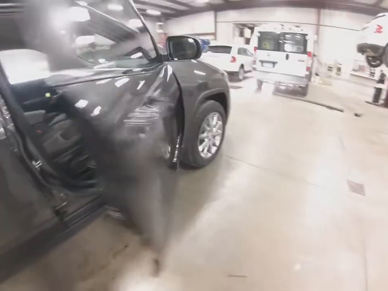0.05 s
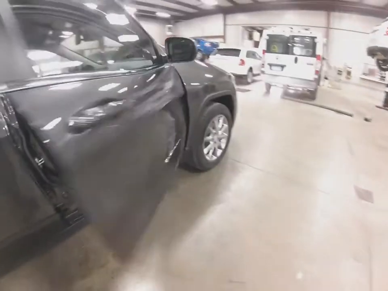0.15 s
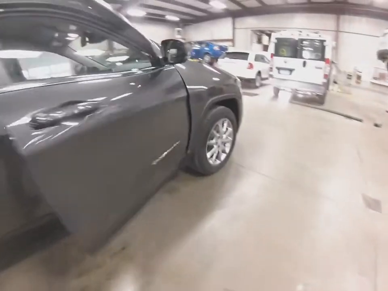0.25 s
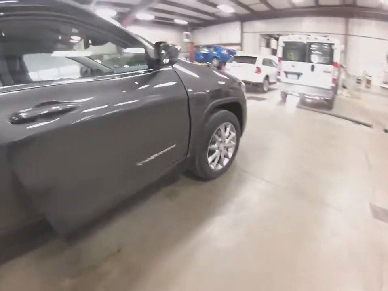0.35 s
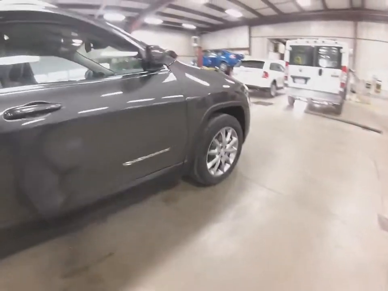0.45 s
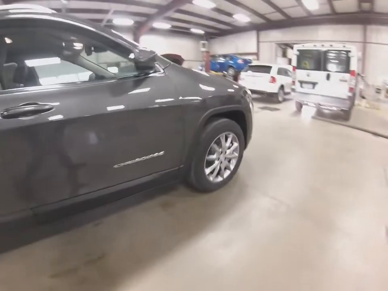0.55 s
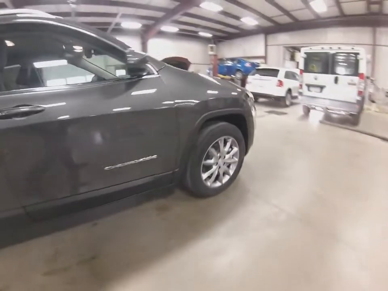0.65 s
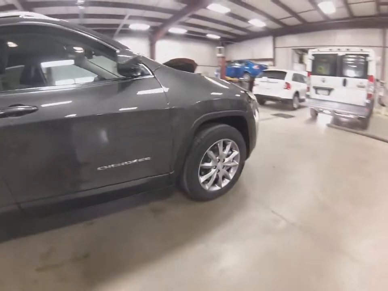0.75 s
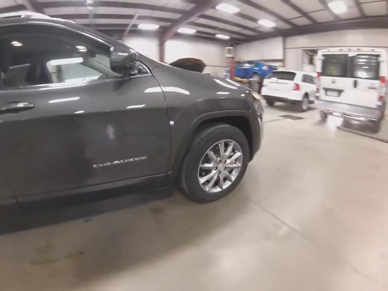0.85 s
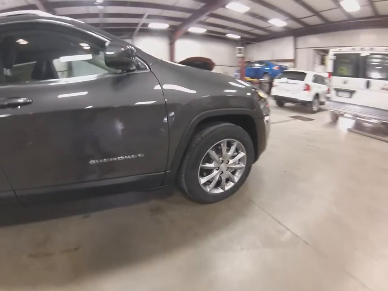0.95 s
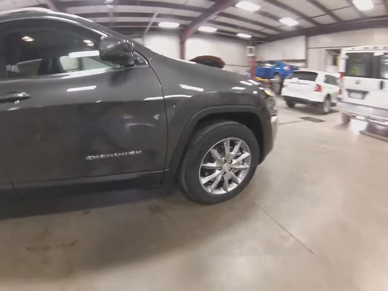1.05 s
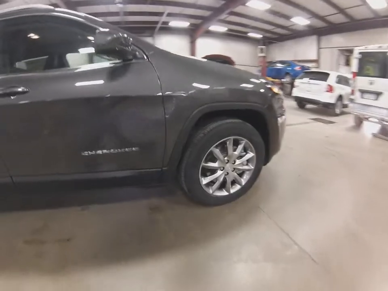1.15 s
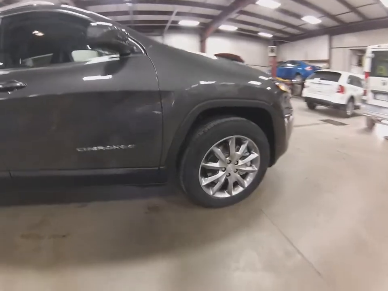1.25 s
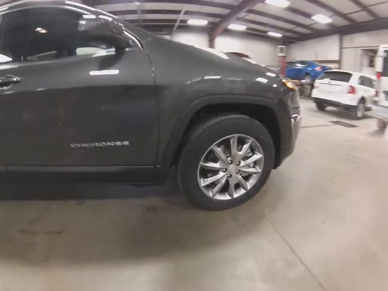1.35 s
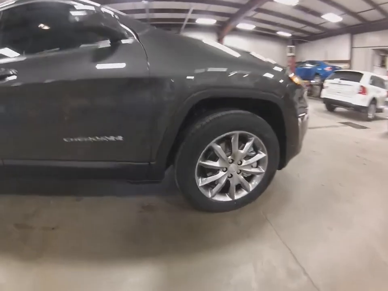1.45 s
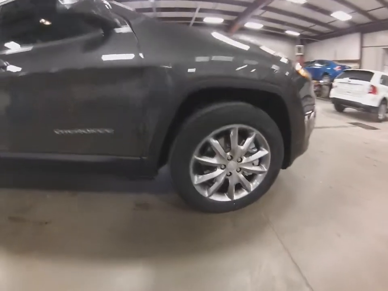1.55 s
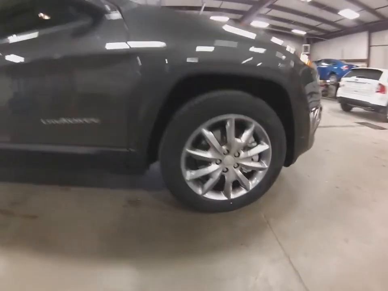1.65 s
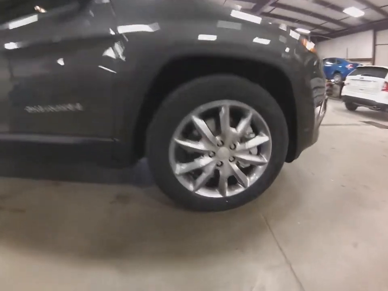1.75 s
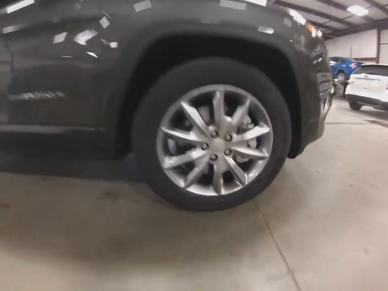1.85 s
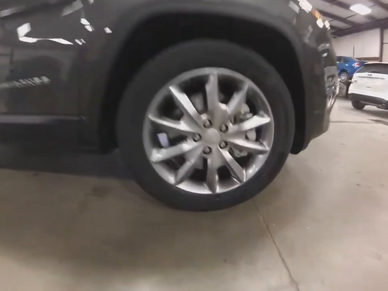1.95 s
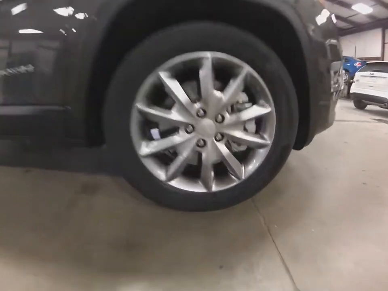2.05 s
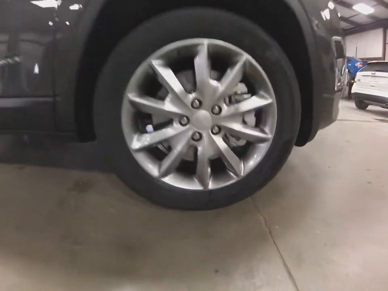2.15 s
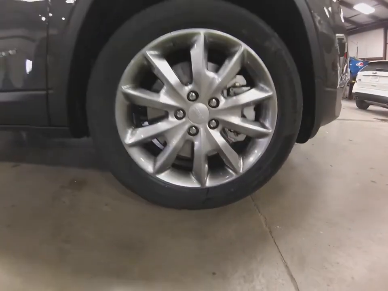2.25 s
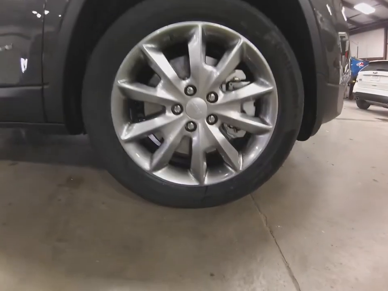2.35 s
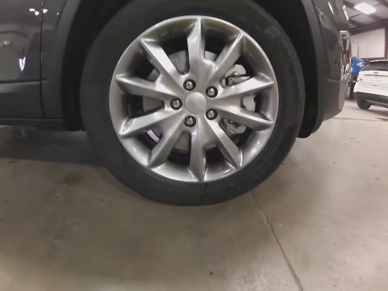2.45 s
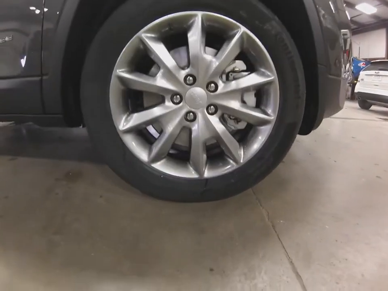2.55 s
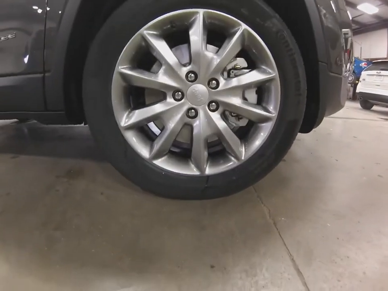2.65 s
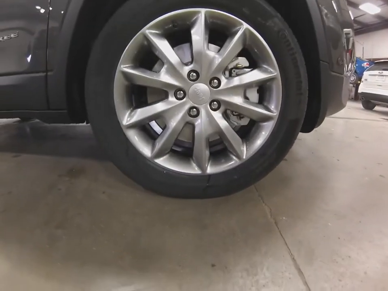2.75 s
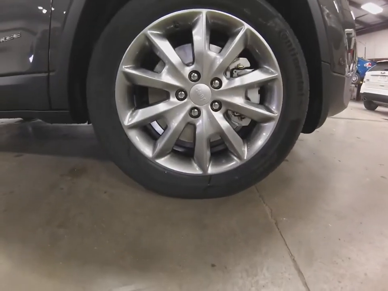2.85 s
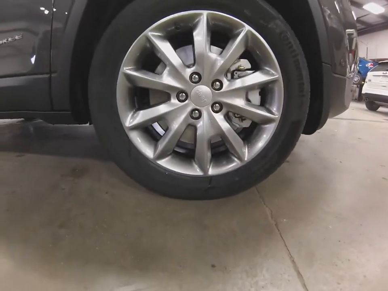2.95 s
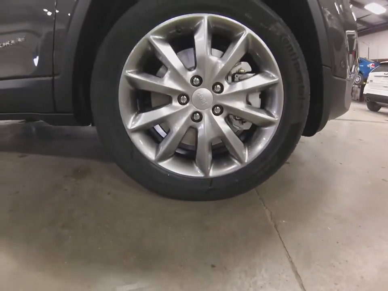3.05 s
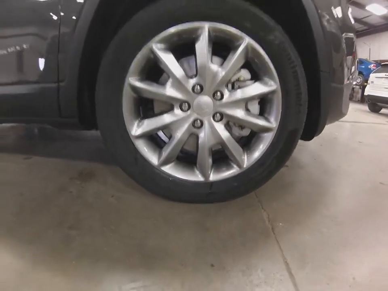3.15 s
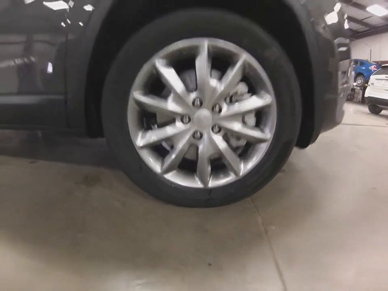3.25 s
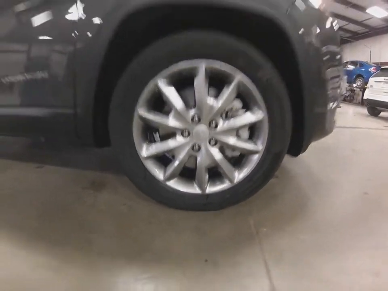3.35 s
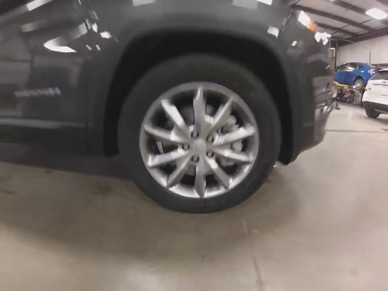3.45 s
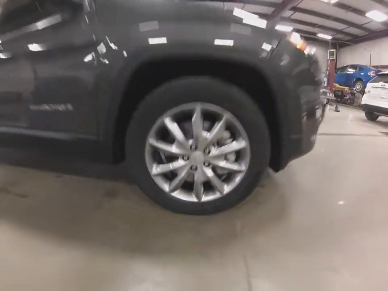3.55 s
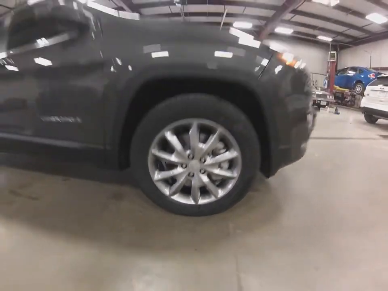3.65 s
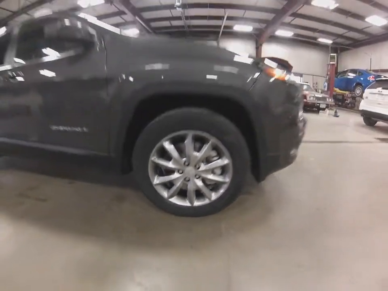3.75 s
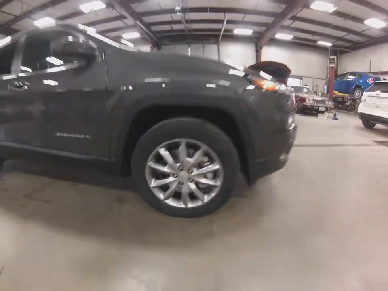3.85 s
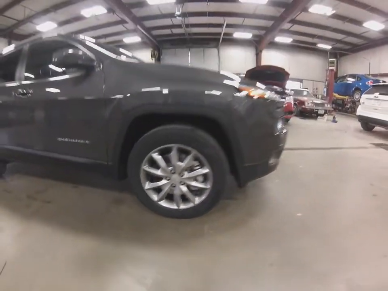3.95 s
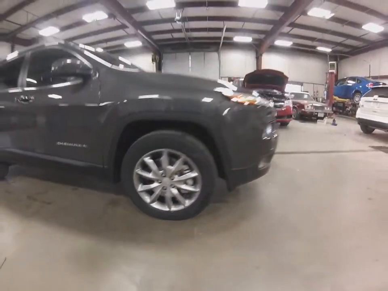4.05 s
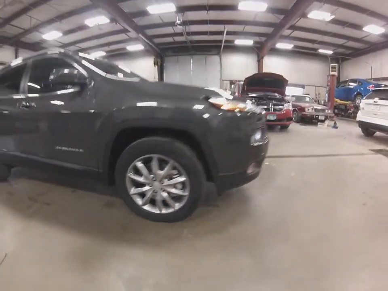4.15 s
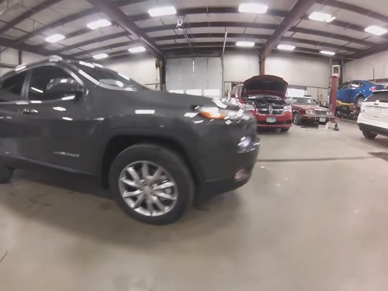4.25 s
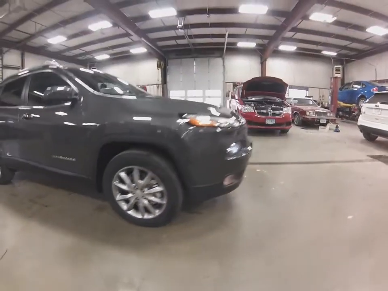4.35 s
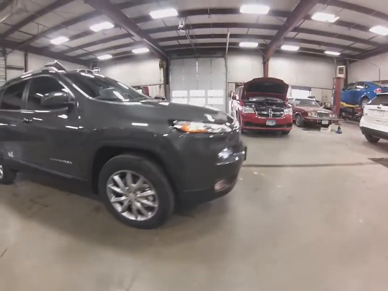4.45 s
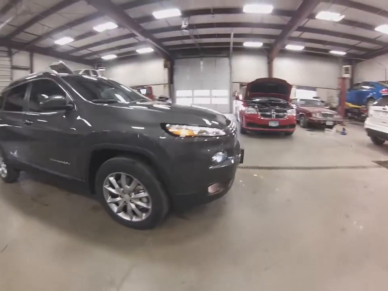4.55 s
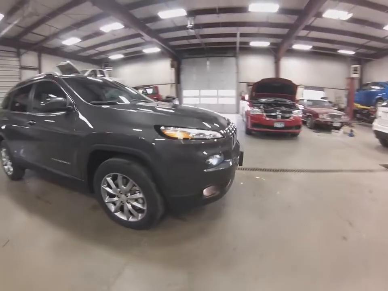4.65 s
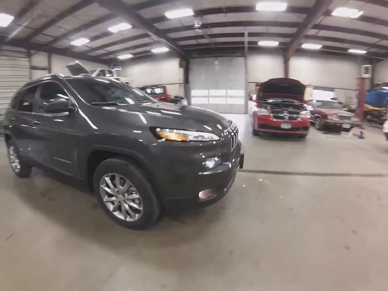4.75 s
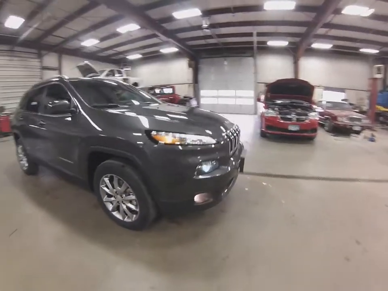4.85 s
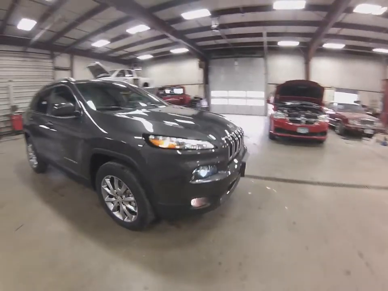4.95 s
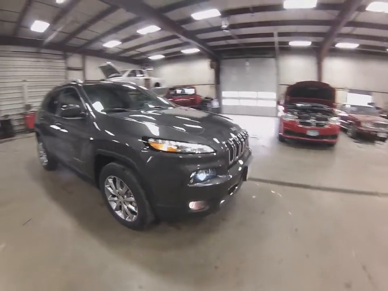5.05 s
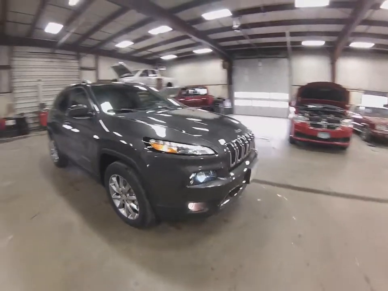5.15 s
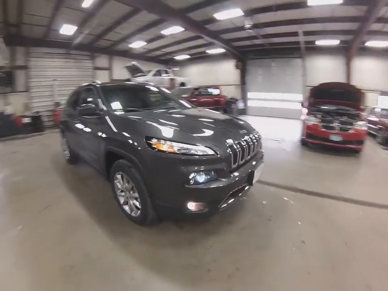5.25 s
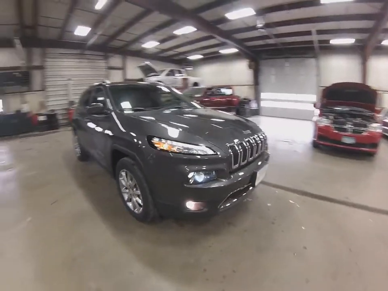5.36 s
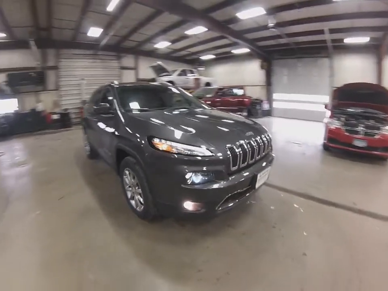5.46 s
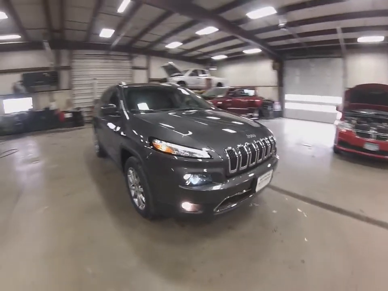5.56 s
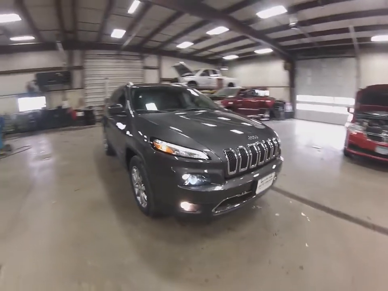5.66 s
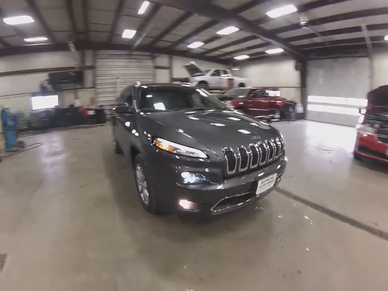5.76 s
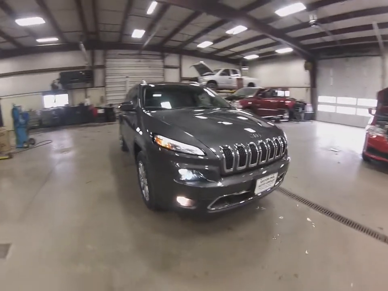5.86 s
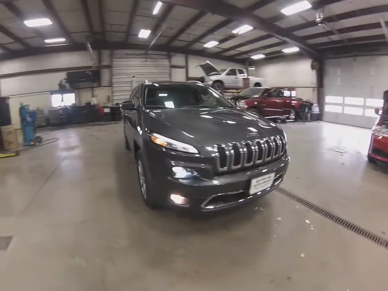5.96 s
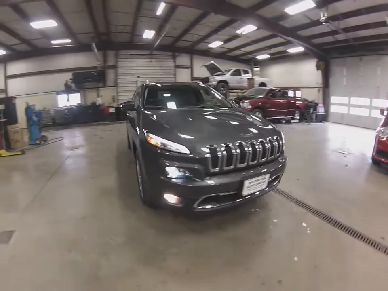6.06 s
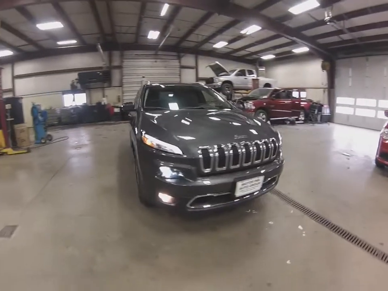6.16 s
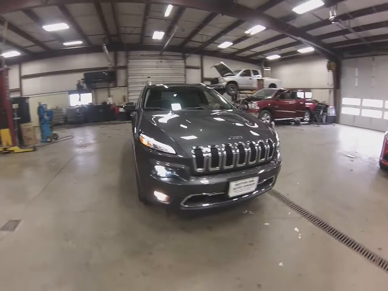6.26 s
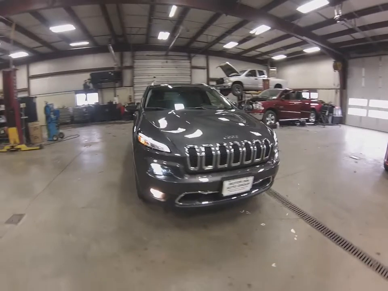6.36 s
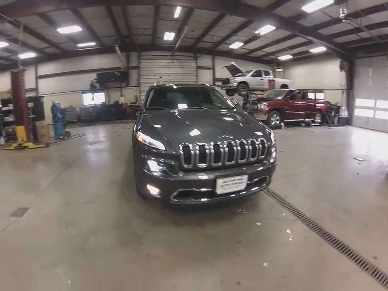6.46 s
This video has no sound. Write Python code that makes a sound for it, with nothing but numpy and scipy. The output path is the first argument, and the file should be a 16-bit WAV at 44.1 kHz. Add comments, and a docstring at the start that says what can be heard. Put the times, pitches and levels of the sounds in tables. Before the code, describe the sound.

Over a droning idle and ventilation rumble, one sharp door slam booms, then engine hiss rises and recedes, with dull distant thumps following.

```python
"""Car door slam beside an idling engine

A car door is slammed in a large workshop while the four-cylinder engine idles: the hinge whispers, the latch
rings, then the lock clatters and the panel booms, almost together, and roof and walls return the boom. The
microphone passes the front wheel, where the engine hisses louder, and moves away. A fan hums, dull thumps come
from across the hall, and a tap, metal ticks and a sliding sole are heard. Bodies are struck modes; rushes and
hisses are shaped noise."""
import sys
import numpy as np
from scipy import signal
from scipy.fft import rfft, irfft
from scipy.io import wavfile
from scipy.ndimage import minimum_filter1d

SR = 44100
rng = np.random.default_rng(int(sys.argv[2]) if len(sys.argv) > 2 else 0)


def wav_out(sig):
    """Save sig, one row per channel (or a flat mono array), as 16-bit PCM at SR to the path in sys.argv[1]."""
    wavfile.write(sys.argv[1], SR, np.round(np.clip(np.atleast_2d(sig).T, -1, 1) * 32767).astype(np.int16))


N = 287046

# Hall reverberation. Each row: frequency in Hz, reverberation level in dB, t60 in seconds.
HALL_REVERB = [(80, -5, 0.65), (147, -7, 0.45), (323, -5, 0.49), (640, -4.5, 0.29), (1500, -3, 0.87),
               (4000, -11, 0.48), (12000, -9, .3)]
# Smeared sound opposite in the two channels. Each row: frequency in Hz, level relative to the shared sound in dB.
WIDTH_SPECTRUM = [(60, -33), (300, -31), (1200, -38.5), (4000, -30.5), (12000, -26)]
# Ventilation spectrum. Each row: frequency in Hz, relative density in dB per Hz.
VENTILATION_SPECTRUM = [(10, -13), (24, -1), (45, 0.5), (70, -5.5), (105, -10), (160, -16.5), (230, -18),
                        (330, -20.5), (480, -25), (610, -23.5), (780, -28), (1150, -23.5), (2300, -32),
                        (5200, -36.5), (8000, -45.5), (15000, -49.5)]
# Fan tones before the swell below. Each row: mean frequency in Hz, level in dB rms.
FAN_TONES = [(301.3, -54), (431, -64.5), (602.6, -70.5), (1233, -69)]
# Swell and fade of the fan's hum along the walk. Each row: time in seconds, gain in dB.
FAN_SWELL = [(0, -9), (1.5, -2), (2.8, -4), (3.7, 3), (4.3, -3), (5.1, 3.5), (5.52, -3.5), (5.9, 4)]

# Dull thumps across the hall. Each row: start in seconds, level in dB, contact in seconds, first rattle knock in dB.
THUMP_HITS = [(4.25, -16.5, 0.014, -26), (4.321, -19.5, 0.009, -32.5), (4.41, -24.5, 0.016, -41),
              (4.534, -24, 0.014, -61), (5.493, -29, 0.013, -49), (5.58, -24.5, 0.014, -48),
              (6.128, -24.5, 0.0075, -46)]
# Thumped body. Each row: frequency in Hz, level in dB, t60 in seconds.
THUMP_BODY_MODES = [(46, 3.5, 0.097), (88.5, 0.5, 0.048), (133.4, -0.5, 0.12), (198, -6, 0.19),
                    (257, -10, 0.13), (335, -10, .08)]
# A rattle is a dying run of lighter knocks.
RATTLE_DELAY_S, RATTLE_GAP_S, RATTLE_CONTACT_S, RATTLE_LOSS_DB = 0.027, 0.014, 0.0039, 2.5

# Sole sliding on concrete. Each row: time of the peak in seconds, level in dB.
SCUFF_PEAKS = [(6.115, -57.5), (6.2, -56.5)]
# Sliding hiss. Each row: frequency in Hz, relative density in dB per Hz.
SCUFF_SPECTRUM = [(2000, -25), (4500, -4), (6200, 6), (7500, -5), (10000, -9), (15000, -17)]
SCUFF_RISE_S, SCUFF_T60_S = 0.029, 0.6

# Small bright metal ticks. Each row: start in seconds, level in dB, frequency in Hz.
METAL_TICKS = [(1.635, -45, 9800), (2.6376, -35.5, 10100), (3.0596, -40.5, 9750), (3.075, -46, 11450),
               (3.205, -48, 11900)]
# Light tap. Each row: start in seconds, level in dB, contact in seconds.
TAP_HITS = [(1.7328, -31, .0003)]
# Tapped body. Each row: frequency in Hz, level in dB, t60 in seconds.
TAP_BODY_MODES = [(294, -9.5, 0.1), (540, 6, 0.0091), (930, 3, 0.0082), (1600, -1, 0.0068)]

# Microphone path from the front wheel. Each row: time in seconds, forward in m, outward in m.
MIC_PATH = [(0, -2, 1.23), (1, -0.6, 1.26), (1.5, -0.8, 0.81), (2.05, -0.12, 0.63), (2.8, 0, 0.59),
            (3.3, -0.08, .6), (3.8, 0.14, 1.12), (4.5, 1.85, 1.3), (6.51, 3, 1.2)]
FIRINGS_PER_S, IDLE_WANDER = 37.6, 0.0024  # mean rate, spread as a share of it
# Engine drone. Each row: multiple of the firing rate, mean level relative to the drone gain in dB.
DRONE_ORDERS = [(2, -2.5), (2.5, -25), (3, 2), (3.5, -14.5), (4, -11), (4.5, -14.5), (5, -9.5), (6, -27),
                (7.5, -12.5)]
# Engine bay rush. Each row: frequency in Hz, relative density in dB per Hz.
BAY_SPECTRUM = [(150, -19), (350, 6.5), (700, -7), (1000, -3.5), (1900, 1.5), (2400, 1.5), (3100, 3),
                (4200, -1), (5500, -6), (7000, -10), (8500, -36), (15000, -55)]
# Engine whine and humps in the bay rush. Each row: centre in Hz, width in Hz, rise in dB.
BAY_WHINE_AND_HUMPS = [(902, 32, 13), (1097, 78, 6.5), (1240, 220, 7.5), (1471, 72, 10.5), (1772, 63, 7.5),
                       (2102, 27, 6), (3090, 140, 3), (4170, 54, 3.5), (7720, 110, 15)]
# Belt hiss. Each row: frequency in Hz, relative density in dB per Hz.
BELT_SPECTRUM = [(5000, -23), (7500, -3), (8700, -2), (10200, -1.5), (12500, -0.5), (14000, -4),
                 (16000, -0.5)]
# Hollow rush from under the car. Each row: frequency in Hz, relative density in dB per Hz.
UNDERBODY_SPECTRUM = [(250, -9), (450, -4.5), (700, 3), (900, 1.5), (1300, -39)]
# Gap under the car. Each row: centre in Hz, width in Hz, rise in dB.
UNDERBODY_RESONANCES = [(577, 26, 11.7), (640, 45, 9), (801, 22, 9.5)]
# Injector ticks. Each row: frequency in Hz, relative density in dB per Hz.
INJECTOR_SPECTRUM = [(9000, -18), (12000, -8), (13500, 7), (15500, -1)]
# Tick strength in firing order, nearer injectors louder. Each entry: mean level in dB.
CYLINDER_TICKS_DB = [2.0, -4.0, -1.0, -5.0]
# Engine parts. Each holds: gain at 1 m in dB, place forward of the wheel in m, loss per doubling of distance in dB.
DRONE_PLACE = (-45.5, -0.18, 4.34)
BAY_PLACE = (-49, 0.025, 7.6)
UNDERBODY_PLACE = (-51.5, -0.75, 5.2)
BELT_PLACE = (-58.5, 0.19, 6.3)
INJECTOR_PLACE = (-58, -.1, 10.5)

# Hinge hiss. Each row: frequency in Hz, relative density in dB per Hz.
HINGE_SPECTRUM = [(2000, -20), (5500, 2), (15000, -4)]
# Hinge resonances. Each row: centre in Hz, width in Hz, rise in dB.
HINGE_RESONANCES = [(5600, 400, 5), (8700, 700, 12), (12100, 450, 12)]
# Latch meets striker. Each row: start in seconds, level in dB, contact in seconds.
LATCH_CONTACTS = [(.5257, -8, 0.000087), (.5293, -19, 0.00051), (.5338, -14, 0.000097)]
# Latch ring. Each row: frequency in Hz, level in dB, t60 in seconds.
LATCH_RING_MODES = [(434, -7.5, 0.044), (790, -15.5, 0.052), (1350, -16, 0.029), (1424, 2, 0.051),
                    (1620, -27, 0.028), (2200, -17, 0.024), (3020, -21.5, .025)]
# Door meets seal and frame. Each row: start in seconds, level in dB, contact in seconds.
DOOR_CONTACTS = [(.5391, 0, .001), (.5416, -5, .0012)]
# Door and cabin. Each row: frequency in Hz, level in dB, t60 in seconds.
DOOR_CABIN_MODES = [(28.5, -6.5, 0.17), (53, -9.5, 0.15), (100, -8.5, 0.08), (166, -10.5, 0.022),
                    (228, -22, 0.052), (316, -16, 0.095), (380, -10.5, 0.05), (477, -15, 0.038),
                    (794, -21, 0.076)]
# Lock and trim clatter. Each row: start in seconds, level in dB rms, t60 in seconds.
CLATTER_BURSTS = [(.538, -14, 0.038), (0.5396, -20.5, 0.032), (0.54, -25, 0.12), (0.552, -33, 0.065)]
# Clatter noise. Each row: frequency in Hz, relative density in dB per Hz.
CLATTER_SPECTRUM = [(300, 13.5), (800, -4), (1800, -5), (3000, -14.5), (5000, -12.5), (8000, -17),
                    (11000, -28.5), (15000, -26)]
# Boom between floor and roof: round trip, level of the first return, loss per return.
FLUTTER_S, FLUTTER_DB, FLUTTER_LOSS_DB = 0.0345, -11.5, 4.5
# Boom back once from each wall. Each row: delay in seconds, level in dB.
WALL_ECHOES = [(.107, -19), (.157, -14), (.194, -15.5), (.256, -17)]

CUTOFF_HZ = 15300


def from_db(db):
    """Decibels to gain."""
    return 10 ** (np.asarray(db) / 20)


def rms_one(x):
    """Scale to unit rms."""
    return x / np.sqrt(np.mean(x ** 2) + 1e-20)


def in_time(rows):
    """Interpolate each column of a timed curve at every sample."""
    time_s, *columns = np.transpose(rows)
    return [np.interp(np.arange(N) / SR, time_s, column) for column in columns]


def drift(rate_hz):
    """Random wander of unit rms, mostly slower than rate_hz."""
    hz = np.arange(N // 2 + 1) * SR / N
    spectrum = rfft(rng.standard_normal(N)) / (1 + (hz / rate_hz) ** 2)
    return rms_one(irfft(spectrum, N))


def spectrum_db(rows):
    """Interpolate a spectrum over log frequency; also return the frequency bins."""
    hz = np.maximum(np.arange(N // 2 + 1) * SR / N, 1)
    points_hz, levels_db = np.transpose(rows)
    return hz, np.interp(np.log(hz), np.log(points_hz), levels_db)


def noise(spectrum, humps=()):
    """Unit-rms noise with a smooth spectrum and humps on it."""
    hz, db = spectrum_db(spectrum)
    for centre_hz, width_hz, rise_db in humps:
        db = db + rise_db / (1 + (2 * (hz - centre_hz) / width_hz) ** 2)
    return rms_one(irfft(rfft(rng.standard_normal(N)) * from_db(db), N))


def dying(start_s, t60_s):
    """An envelope that jumps to 1 and decays by 60 dB in t60_s."""
    age_s = np.arange(N) / SR - start_s
    return (age_s >= 0) * np.exp(-np.log(1000) * np.clip(age_s / t60_s, 0, 10))


def strike(hits, modes, rise_s=0.0001):
    """Rounded pushes ring a body's modes; longer contact is duller, and the ring takes a moment to spread."""
    force = np.zeros(N)
    for start_s, db, contact_s in hits:
        contact_s = max(contact_s, 2 / SR)
        progress = np.clip((np.arange(N) / SR - start_s) / contact_s, 0, 1)
        push = np.sin(np.pi * progress) ** 2
        force += from_db(db) * push / push.sum()
    t = np.arange(SR // 2) / SR
    ring = np.zeros(len(t))
    for hz, db, t60_s in modes:
        ring += from_db(db) * np.cos(2 * np.pi * hz * t) * np.exp(-np.log(1000) * t / t60_s)
    return signal.fftconvolve(force, ring * (1 - np.exp(-t / rise_s)))[:N]


def hall(x, build_s=0.011):
    """Diffuse reverberation: octave bands of noise build up and die at their own pace."""
    t = np.arange(SR) / SR
    response = np.zeros(SR)
    points_hz, levels_db, t60s_s = np.transpose(HALL_REVERB)
    for low_hz in 56 * 2.0 ** np.arange(8):
        log_centre = np.log(low_hz * np.sqrt(2))
        level_db = np.interp(log_centre, np.log(points_hz), levels_db)
        t60_s = np.interp(log_centre, np.log(points_hz), t60s_s)
        envelope = np.exp(-np.log(1000) * t / t60_s) * (1 - np.exp(-t / build_s))
        band = signal.butter(2, [low_hz, 2 * low_hz], "band", fs=SR, output="sos")
        tail = signal.sosfilt(band, rng.standard_normal(SR) * envelope)
        response += from_db(level_db) * np.sqrt(2 * low_hz / SR) * tail / np.linalg.norm(tail)
    return signal.fftconvolve(x, response)[:N]


def smeared(x, smear_t60_s=0.12):
    """A faint copy of the sound, smeared in time by a dying noise burst."""
    _, db = spectrum_db(WIDTH_SPECTRUM)
    burst = rng.standard_normal(N) * dying(0, smear_t60_s)
    faint = irfft(rfft(x) * from_db(db), N)
    return signal.fftconvolve(faint, burst / np.linalg.norm(burst))[:N]


def sideways(x):
    """Opposite in the two channels: heard as width."""
    return x * np.array([[1], [-1]])


def shop(air_db=-40.5, waver_db=1.5, wander_hz=1.39):
    """Ventilation rumbles as shaped noise; a fan's tones waver in level and pitch."""
    fan = np.zeros(N)
    for hz, db in FAN_TONES:
        level = from_db(db + waver_db * drift(4.1))
        phase = 2 * np.pi * np.cumsum(hz + wander_hz * drift(3.1)) / SR
        fan += level * np.sin(phase)
    swell = from_db(in_time(FAN_SWELL)[0])
    return from_db(air_db) * noise(VENTILATION_SPECTRUM) + np.sqrt(2) * swell * fan


def thumps(wet_db=-1.0, uneven=0.15):
    """Each distant thump is a soft push followed by a short uneven rattle."""
    hits = []
    for start_s, db, contact_s, rattle_db in THUMP_HITS:
        hits.append((start_s, db, contact_s))
        for k, slip in enumerate(rng.standard_normal(size=3)):
            knock_s = start_s + RATTLE_DELAY_S + RATTLE_GAP_S * (k + uneven * slip)
            hits.append((knock_s, rattle_db - k * RATTLE_LOSS_DB, RATTLE_CONTACT_S))
    body = -strike(hits, THUMP_BODY_MODES)
    return body + from_db(wet_db) * hall(body)


def scuff():
    """A soft hiss, as of a sole sliding on concrete: each slide swells quickly and dies away."""
    t = np.arange(N) / SR
    slides = np.zeros(N)
    for peak_s, db in SCUFF_PEAKS:
        swell = np.exp(-np.abs(t - peak_s) / SCUFF_RISE_S)
        slides += from_db(db) * np.where(t < peak_s, swell, dying(peak_s, SCUFF_T60_S))
    return slides * noise(SCUFF_SPECTRUM)


def tap(wet_db=-4.0):
    """A brief contact rings a small body, and the hall answers."""
    body = strike(TAP_HITS, TAP_BODY_MODES)
    return body + from_db(wet_db) * hall(body)


def metal_ticks(tick_t60_s=0.031, ring_db=-14, ring_t60_s=0.3):
    """Decaying tones with a short sharp start and a faint, randomly modulated ring."""
    t = np.arange(N) / SR
    ticks = np.zeros(N)
    for start_s, db, hz in METAL_TICKS:
        ring = from_db(ring_db) * drift(120) * dying(start_s, ring_t60_s)
        ticks += from_db(db) * np.sin(2 * np.pi * hz * t) * (dying(start_s, tick_t60_s) + ring)
    return ticks


def heard_from(place):
    """Gain of a part of the engine, by its distance from the walking microphone."""
    level_db, place_m, loss_db = place
    forward_m, outward_m = in_time(MIC_PATH)
    distance_m = np.hypot(forward_m - place_m, outward_m)
    return from_db(level_db - loss_db * np.log2(distance_m + 1e-9))


def injectors(phase, tick_t60_s=0.035, uneven_db=2.2):
    """One faint bright tick per firing; its strength depends on the cylinder and on chance."""
    firing, part = np.divmod(phase / (2 * np.pi), 1)
    firing = firing.astype(int)
    cylinder_db = np.array(CYLINDER_TICKS_DB)[firing % len(CYLINDER_TICKS_DB)]
    strength_db = cylinder_db + uneven_db * rng.standard_normal(size=400)[firing]
    decay = np.exp(-np.log(1000) * part / FIRINGS_PER_S / tick_t60_s)
    return noise(INJECTOR_SPECTRUM) * from_db(strength_db) * decay


def engine(firing_db=-39.5, waver_db=1.5, throb=0.07):
    """Firing pulses drone through the body; belts and valves rush out of the wheel arch and from under the car."""
    phase = 2 * np.pi * np.cumsum(FIRINGS_PER_S * (1 + IDLE_WANDER * drift(1.59))) / SR
    drone = np.zeros(N)
    for multiple, db in DRONE_ORDERS:
        level = from_db(db + waver_db * drift(6.1))
        drone += level * np.sin(multiple * phase + rng.uniform(0, 2 * np.pi))
    # the long wave of the firing rate fills the hall evenly
    firing = from_db(firing_db) * np.sin(phase)
    tones = np.sqrt(2) * (firing + heard_from(DRONE_PLACE) * drone)
    rush = heard_from(BAY_PLACE) * noise(BAY_SPECTRUM, BAY_WHINE_AND_HUMPS)
    rush += heard_from(BELT_PLACE) * noise(BELT_SPECTRUM)
    rush += heard_from(UNDERBODY_PLACE) * noise(UNDERBODY_SPECTRUM, UNDERBODY_RESONANCES)
    throbbing = rush * (1 + throb * np.cos(phase))
    return tones + throbbing + heard_from(INJECTOR_PLACE) * injectors(phase)


def hinge(level_db=-56.0, swing_s=0.065, stop_s=0.008):
    """A faint hiss that grows as the door swings shut and stops when the latch catches."""
    ahead_s = LATCH_CONTACTS[0][0] - np.arange(N) / SR
    swell = np.exp(-(ahead_s / np.where(ahead_s > 0, swing_s, stop_s)) ** 2 / 2)
    return from_db(level_db) * swell * noise(HINGE_SPECTRUM, HINGE_RESONANCES)


def boom_echoes(boom, wall_hz=85):
    """Roof and walls return only the low part of the boom."""
    low_pass = signal.butter(2, wall_hz, fs=SR, output="sos")
    dull = signal.sosfilt(low_pass, boom)
    t = np.arange(N) / SR
    flutter = [((k + 1) * FLUTTER_S, FLUTTER_DB - k * FLUTTER_LOSS_DB) for k in range(3)]
    return sum(from_db(db) * np.interp(t - delay_s, t, dull) for delay_s, db in flutter + list(WALL_ECHOES))


def door(wet_db=-5, latch_wet_db=-15):
    """The latch rings first, then the lock clatters and the panel lands, almost together."""
    latch = strike(LATCH_CONTACTS, LATCH_RING_MODES, rise_s=0.001)
    # the panel moves away, so the pressure first drops
    boom = -strike(DOOR_CONTACTS, DOOR_CABIN_MODES, rise_s=0.00023)
    bursts = sum(from_db(db) * dying(start_s, t60_s) for start_s, db, t60_s in CLATTER_BURSTS)
    clatter = noise(CLATTER_SPECTRUM) * bursts
    # the latch sits inside the door gap and sends little into the hall
    tail = hall(from_db(wet_db) * (boom + clatter + from_db(latch_wet_db) * latch))
    return latch + boom + clatter + boom_echoes(boom) + tail


def scene():
    """Both channels hear nearly the same; a faint smeared copy, opposite in the two, gives a little width."""
    shared = shop() + thumps() + scuff() + tap() + metal_ticks() + engine() + hinge() + door()
    return shared + sideways(smeared(shared))


def record(dry, threshold_db=-7, hold_s=0.032, release_db_per_s=110, attack_s=0.028):
    """Gain control ducks after a loud peak and recovers; peaks are clipped and the top is cut."""
    t = np.arange(N) / SR
    peak_db = 20 * np.log10(np.abs(dry).max(axis=0) + 1e-9)
    over_db = np.maximum(peak_db - threshold_db, 0)
    half = int(hold_s * SR / 2)
    held_db = -minimum_filter1d(-over_db, 2 * half + 1, origin=half)
    # fall back linearly in dB
    duck_db = np.maximum.accumulate(held_db + release_db_per_s * t) - release_db_per_s * t
    pole = np.exp(-1 / (attack_s * SR))
    smooth_db = signal.lfilter([1 - pole], [1, -pole], duck_db)
    clipped = np.clip(dry * from_db(-smooth_db), -1, 1)
    return signal.sosfilt(signal.ellip(10, 0.1, 80, CUTOFF_HZ, fs=SR, output="sos"), clipped)


dry = scene()
out = record(dry)
wav_out(out)
```